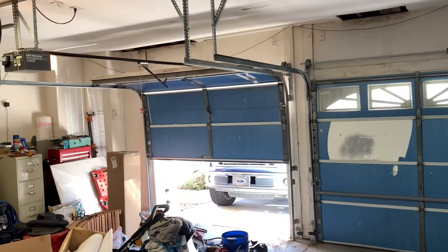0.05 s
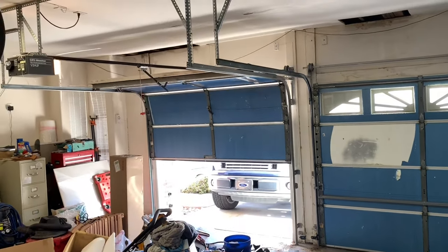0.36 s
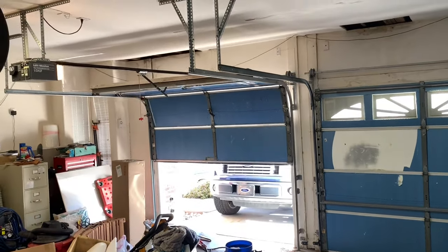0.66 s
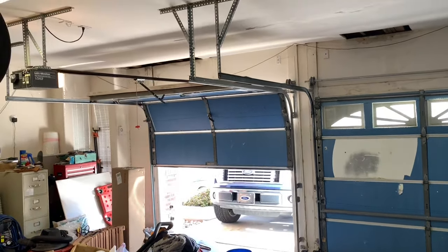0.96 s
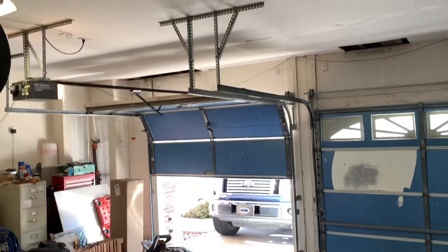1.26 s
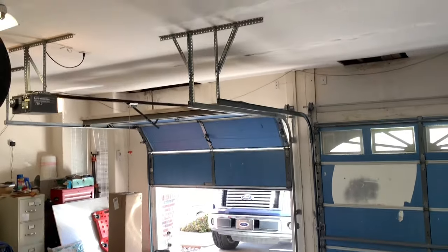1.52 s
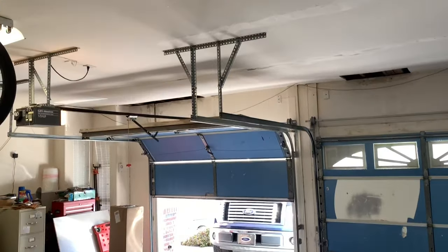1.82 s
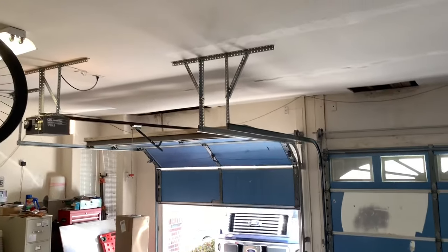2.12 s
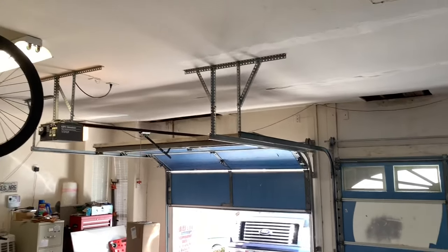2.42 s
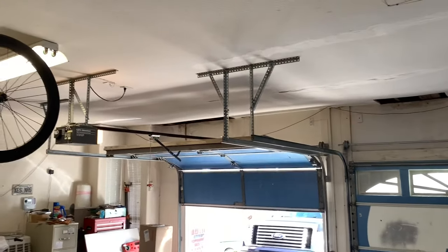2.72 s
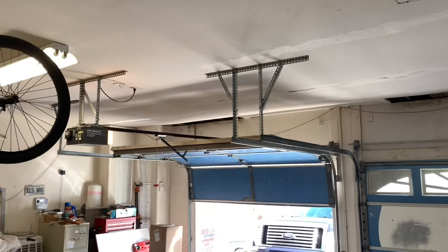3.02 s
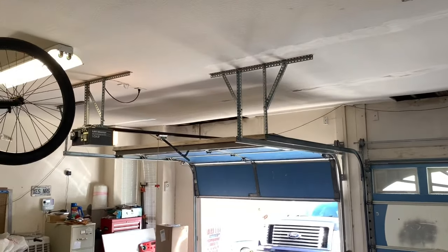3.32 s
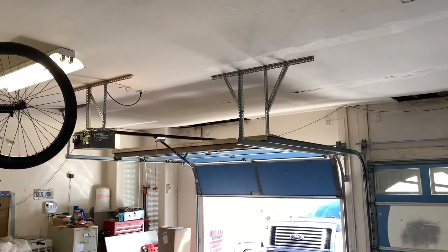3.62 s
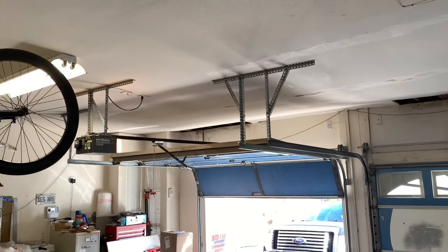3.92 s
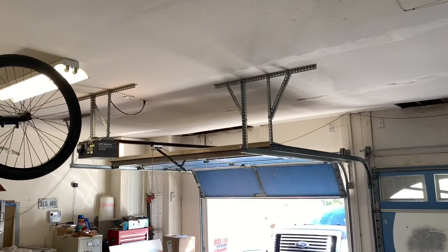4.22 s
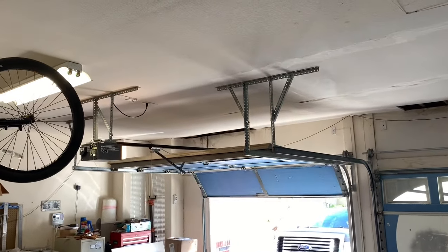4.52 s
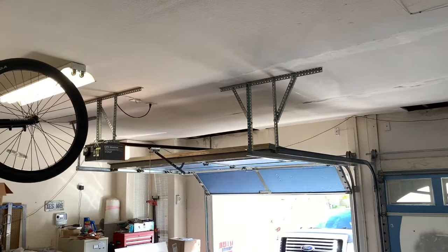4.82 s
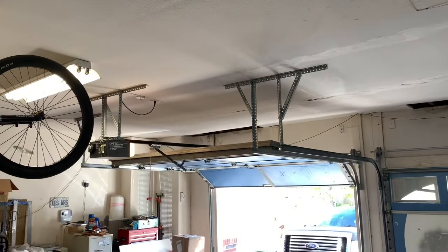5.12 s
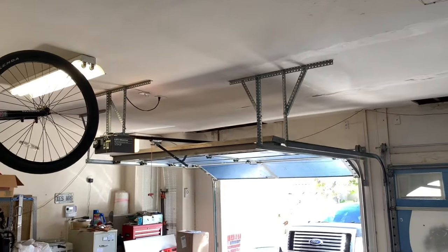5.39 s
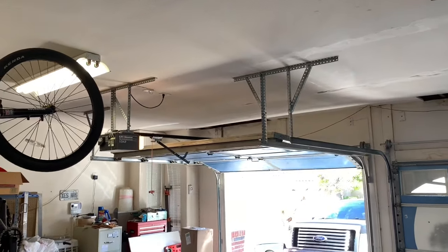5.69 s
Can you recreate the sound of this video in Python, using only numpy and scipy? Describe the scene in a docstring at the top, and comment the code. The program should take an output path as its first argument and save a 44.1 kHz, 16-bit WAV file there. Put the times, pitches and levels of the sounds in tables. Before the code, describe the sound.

A sectional garage door rolls open with a low motor hum, rattling panels, grinding rollers and one clank near the end.

```python
"""A motor hums and steel panels rumble: an electric opener lifts a sectional door a few metres away.
Magnetic forces make the hum, at twice the mains frequency. The chain jingles and jolts the door about
six times a second, while rollers grind along their tracks and shake the panels. Hinges tick as they
fold, and near the end one section drops over with a clank. The hard garage walls reverberate."""
import sys
import numpy as np
from scipy import signal
from scipy.fft import rfft, irfft
from scipy.io import wavfile

SR = 44100
rng = np.random.default_rng(int(sys.argv[2]) if len(sys.argv) > 2 else 0)


def generate_wav(signal):
    """Clip the signal to [-1, 1] and save it as 16-bit WAV at the path in sys.argv[1]."""
    frames = np.transpose(np.atleast_2d(signal))
    scaled = np.clip(frames, -1, 1) * 32767
    pcm = np.round(scaled).astype(np.int16)
    wavfile.write(sys.argv[1], SR, pcm)


N = 253575
TIME = np.arange(N) / SR
MAINS_HZ, WAVER_HZ = 60.007, 352

# The hum eases once most of the door lies overhead.
# Each row: time in seconds, level of the hum in dB, level of its octave in dB.
HUM_LEVELS = [(0, -17, -26), (.45, -17, -25), (.95, -18, -24.5), (1.35, -18.5, -25), (1.7, -17.5, -24.5),
              (2.3, -18.5, -27), (2.47, -18, -21.5), (2.7, -19, -26.5), (3.0, -17.5, -25),
              (3.7, -17, -22.5), (4.35, -22.5, -27.5), (5.0, -25, -26), (5.75, -22.5, -30.5)]
# That octave briefly fades four times. Each row: time in seconds, change in dB.
OCTAVE_DIPS = [(1.59, -8.5), (2.06, -24), (2.54, -17), (3.92, -7.5)]
# Buzz of the motor housing. Each row: multiple of the hum frequency, dB relative to the octave.
HOUSING_BUZZ = [(3, -24), (4, -23), (5, -27), (6, -26), (7, -27)]

# Shudder of the panels, grind of the rollers and jingle of the chain as the door travels.
# Each row: time in seconds, relative level in dB.
PANEL_LEVELS = [(0, -22.8), (.8, -24.3), (1.25, -21.3), (1.6, -21.5), (2.0, -20.3), (2.7, -21.7),
                (3.3, -21.3), (3.6, -19.5), (3.9, -22), (4.13, -20.5), (4.4, -22.8), (4.75, -22.5),
                (5.1, -19.3), (5.45, -23), (5.75, -20.7)]
ROLLER_LEVELS = [(0, -29), (.7, -29.5), (1.8, -26.5), (2.25, -22), (2.6, -27.5), (3.2, -26.5), (3.8, -25),
                 (4.1, -26.5), (4.3, -27), (4.75, -29), (4.97, -24), (5.5, -26.5), (5.75, -27)]
CHAIN_LEVELS = [(0, -.5), (.6, 0.5), (1.5, -2.5), (2.05, -1), (2.75, 2), (3.15, 1.5), (3.9, -1.5),
                (4.2, -4), (4.8, -0.5), (5.3, -3), (5.75, -7.5)]

# Tugs of the chain. Each row: peak time in seconds, clatter of fittings in dB, knock of panels in dB.
TUGS = [(.035, -27.5, -29), (.185, -26, -26.5), (.34, -28.5, -27.5), (.495, -31, -27.5), (.68, -36, -31.5),
        (.77, -34, -37), (.835, -30.5, -31), (.91, -30, -25), (1.01, -32, -32), (1.165, -28, -27),
        (1.35, -27.5, -32), (1.465, -34, -32), (1.63, -26.5, -24.5), (1.8, -31, -33), (1.9, -32.5, -42),
        (1.98, -23, -48), (2.135, -25.5, -32), (2.275, -25, -29), (2.37, -33, -32), (2.48, -26.5, -32),
        (2.64, -26, -29.5), (2.785, -29.5, -33), (2.946, -27.5, -27), (3.095, -26, -31),
        (3.245, -27.5, -30.5), (3.385, -29.5, -26.5), (3.55, -34, -28.5), (3.68, -46, -32),
        (3.79, -56, -25.5), (3.95, -35, -27.5), (4.065, -48, -25), (4.44, -34, -33.5), (4.56, -38, -30.5),
        (4.73, -33, -35), (4.9, -43, -29), (5.44, -32, -40), (5.63, -48, -28), (5.73, -30, -27.5)]
# Hinges snapping. Each row: start in seconds, relative level in dB, offsets of clink and ring in dB.
HINGE_SNAPS = [(.063, -22.5, 4.5, -15), (.12, -18, -12, -25), (0.502, -23.5, 1, -20), (.655, -14, -2, -15),
               (.888, -21, 2, 3), (.982, -19.5, -13, -20), (1.133, -24, -4, -23), (1.273, -21, -2, -13),
               (1.336, -17, -13, -25), (1.45, -22.5, -1, -10), (1.508, -27, -12, -20),
               (1.786, -37, -7, -15), (1.885, -26.5, 3, -4), (2.094, -27, 11, 6), (2.239, -18, -0.5, 2),
               (2.603, -17.5, -1, -13), (2.879, -28, -10, -25), (3.019, -27, -8, -15), (3.089, -25, 2, -1),
               (3.183, -40, -8, -20), (3.603, -29, -8, -20), (3.672, -21.5, -12, -15),
               (3.82, -16.5, -14, -25), (3.892, -17, -10, -20), (3.961, -23.5, 2, -20),
               (4.817, -20.5, -21, -30), (5.34, -24, -3, -16)]
# A section dropping and bouncing. Each row: start in seconds, relative level in dB.
SECTION_BLOWS = [(5.030, -15), (5.042, -17), (5.053, 0), (5.063, -3.5), (5.088, -6.5), (5.116, -10)]

# Tone colours as heard. Each row: frequency in Hz, relative spectral density in dB.
PANEL_SPECTRUM = [(22, -11), (32, -21), (40, -1), (53, 0.5), (70, -1), (100, -1), (135, -6.5), (195, -4),
                  (240, -4.5), (280, -7.5), (350, -10), (410, -12.5), (520, -14.5), (800, -30)]
CLATTER_SPECTRUM = [(800, -8), (1400, -1), (2000, 0.5), (2450, -2.5), (2800, -5), (3300, -4), (4500, -13),
                    (6000, -21), (9000, -17.5)]
KNOCK_SPECTRUM = [(300, -8.5), (520, 5.5), (850, 3.5), (1150, 1.5), (1700, -7), (3500, -23)]
ROLLER_SPECTRUM = [(250, -18), (450, 1.5), (700, 1), (900, 1), (1300, -4), (2200, -8.5), (3500, -16),
                   (7000, -24.5)]
CLANK_SPECTRUM = [(150, -4), (500, -5), (1200, -3.5), (1600, 1), (2100, 5), (2800, 5.5), (3600, 2.3),
                  (4100, 0), (4750, 1.8), (5400, -4.5), (8000, -8), (10300, -8), (13000, -12), (15000, -20)]
TICK_SPECTRUM = [(2000, -7), (4500, -8), (7500, -7), (9200, -3.5), (10600, -9), (14000, -10), (15000, -14)]
CLINK_SPECTRUM = [(1000, -9), (2200, -8), (3300, -3), (4600, -3.5), (5500, -5.5), (7500, -17)]
# Tone colour of the bright jingle as heard. Each row: frequency in Hz, relative spectral density in dB.
JINGLE_SPECTRUM = [(1200, -12), (2500, -3), (3400, -1.5), (4500, -2), (5500, -6.5), (6300, -9.5),
                   (7500, -11), (8700, -10.5), (10300, -10), (11800, -13), (13200, -9.8), (14500, -13)]

# Modes of a section's steel edge, a hinge plate and the door's hardware.
# Each row: frequency in Hz, relative level in dB, time to decay by 60 dB in seconds.
EDGE_MODES = [(2013, -2, .15), (2719, -2, .12), (2961, 2, .13), (3170, -2, .1), (3650, 0, .1),
              (4258, 0, .12), (4690, -1, .12), (4830, 1, .12), (6298, 0, .12), (7130, -2, .1),
              (7558, 0, .12)]
HINGE_MODES = [(4215, 0, .13), (3560, -10, .08), (5210, -10, .08)]
HARDWARE_MODES = [(1650, -2, .15), (2080, 1, .15), (2480, 0, .12), (2720, -1, .1), (2950, -1, .1),
                  (3600, 1, .1), (4154, -2, .25), (4775, 3, .2), (6089, -3, .25), (7555, -6, .2)]

# Decay of sound in the garage. Each row: frequency in Hz, reverberation time in seconds.
GARAGE_T60 = [(60, 0.56), (500, 1), (2500, 0.79), (6000, 0.44), (13000, 0.21)]
# Width of the diffuse field. Each row: frequency in Hz, side level minus mid level in dB.
FIELD_WIDTH = [(60, -11.5), (150, -15.5), (280, -9), (500, -3.5), (1500, -0.5), (4000, -.5), (8000, 0.5),
               (13000, -1)]


def motor():
    """Magnetic force peaks twice per mains cycle; the hum wavers slightly and its octave briefly fades."""
    phase = 2 * np.pi * 2 * MAINS_HZ * TIME
    hum_db, octave_db = curve(HUM_LEVELS), curve(HUM_LEVELS, column=2)
    dip_db = sum(db * swell(s, rise_s=.028, fall_s=.028) for s, db in OCTAVE_DIPS)
    hum = undb(hum_db + .53 * wander(54)) * np.cos(phase + .024 * wander(7.9))
    octave = undb(octave_db + dip_db + .3 * wander(8)) * np.cos(2 * phase + .02 * wander(6))
    buzz = sum(undb(octave_db + db + 2 * wander(6.8)) * np.cos(k * phase + .5 * wander(2))
               for k, db in HOUSING_BUZZ)
    # a faint tone wavers above the hum
    waver_gain = undb(hum_db - 20 + 2 * wander(6.3))
    waver = waver_gain * np.cos(2 * np.pi * WAVER_HZ * TIME + 1.33 * wander(5.8))
    return np.sqrt(2) * (hum + octave + buzz + waver)


def panels():
    """Forced vibration: the wide sections shudder as they roll and radiate a low boom."""
    boom = diffuse(contacts(2500, 2.56), contacts(2500, 3), PANEL_SPECTRUM)
    return boom * undb(curve(PANEL_LEVELS))


def jolts():
    """Impact excitation: each tug shifts the sections, so fittings clatter and panels knock dully."""
    shake = sum(tug(s) * undb(db) for s, db, _ in TUGS)
    bump = sum(tug(s) * undb(db) for s, _, db in TUGS)
    fittings = np.array([contacts(3500, 2.5) for _ in range(2)])
    mid, side = fittings + undb(-6) * pings(480, low_hz=1100, high_hz=2700)
    clatter = diffuse(mid, side, CLATTER_SPECTRUM) * linger(shake, wet_db=-2.5)
    knock = diffuse(contacts(2500, 2), contacts(2500, 2), KNOCK_SPECTRUM) * linger(bump, wet_db=-2)
    return clatter + knock


def rollers():
    """Rolling noise: steel wheels strike grit and dents, and the track rings briefly here and there."""
    grit = np.array([contacts(3000, 1.34) for _ in range(2)])
    mid, side = grit + undb(-12.5) * pings(420, low_hz=900, high_hz=2900)
    return diffuse(mid, side, ROLLER_SPECTRUM) * undb(curve(ROLLER_LEVELS))


def section_clank():
    """Impact and rebound: a section drops over the bend of the track, exciting the modes of its edge."""
    crack = blows(SECTION_BLOWS, chatter_s=.0075)
    ring = undb(5) * struck(SECTION_BLOWS, EDGE_MODES)
    return undb(-7.5) * garage(colour(crack + ring, CLANK_SPECTRUM), direct_db=-3, places=2)


def hinges():
    """Transient excitation: a folding hinge ticks and clinks, and its plate rings on freely."""
    ticks = [(s, db) for s, db, _, _ in HINGE_SNAPS]
    clinks = [(s, db + clink_db) for s, db, clink_db, _ in HINGE_SNAPS]
    rings = [(s, db + ring_db) for s, db, _, ring_db in HINGE_SNAPS]
    tick = undb(4) * colour(blows(ticks, chatter_s=.0061), TICK_SPECTRUM)
    clink = undb(5) * colour(blows(clinks, chatter_s=.014), CLINK_SPECTRUM)
    ring = undb(15) * struck(rings, HINGE_MODES)
    return garage(tick + clink + ring, direct_db=-6, places=8)


def chain():
    """Loose links collide at random and excite faint resonances in the steel hardware."""
    dip_db = sum(tug(s) for s, _, _ in TUGS)  # about 1 dB softer at each tug
    level_db = curve(CHAIN_LEVELS) - dip_db + 2.8 * wander(35)
    links = contacts(420, 4.5) * undb(level_db)
    jingle = colour(links + undb(-20) * resonate(links, HARDWARE_MODES), JINGLE_SPECTRUM)
    return undb(-36) * unit(garage(jingle, direct_db=-16, places=20))


def tug(peak_s):
    """A pulse of tension: the chain tightens quickly and slackens more slowly."""
    return swell(peak_s, rise_s=.02, fall_s=.034)


def contacts(per_second, scatter_db):
    """Shot noise: tiny independent impacts, a few harder than the rest; rms 1."""
    impulses = (rng.random(N) < per_second / SR) * rng.choice([-1, 1], N)
    return unit(impulses * undb(scatter_db * np.minimum(rng.standard_normal(N), 2)))


def blows(events, chatter_s):
    """Contact chatter: each blow of metal on metal is a noise burst with exponential decay."""
    force = sum(undb(db) * (TIME >= s) * np.exp(-np.abs(TIME - s) / chatter_s) for s, db in events)
    return force * rng.standard_normal(N)


def pings(per_second, low_hz, high_hz):
    """Damped oscillation of small steel parts, each at its own pitch and place; mid and side, rms 1."""
    t = TIME[:SR // 12]
    fade = decay(t, t60=.12)
    mid_side = np.zeros((2, N + 2 * len(t)))
    for when, pitch, size, place in rng.random((int(per_second * N / SR), 4)):
        start, angle = int(when * (N + len(t))), 2 * np.pi * place
        ring = size * fade * np.sin(2 * np.pi * (low_hz + pitch * (high_hz - low_hz)) * t)
        mid_side[:, start:start + len(t)] += np.outer([np.cos(angle), np.sin(angle)], ring)
    return unit(mid_side[:, len(t):len(t) + N])


def struck(events, modes):
    """An impulse excites all the modes of a part at once."""
    force = np.zeros(N)
    for s, db in events:
        force[int(s * SR)] += undb(db)
    return resonate(force, modes)


def resonate(force, modes):
    """Modal superposition: the force is convolved with a sum of damped sines of total energy 1."""
    t = TIME[:SR // 2]
    ring = sum(undb(db) * np.sin(2 * np.pi * hz * t) * decay(t, t60) for hz, db, t60 in modes)
    return signal.oaconvolve(force, ring / np.linalg.norm(ring))[:N]


def garage(x, direct_db, places):
    """Room response depends on position: a moving part meets new reflections at each place."""
    place = (places - 1) * TIME / TIME[-1]
    ears = np.zeros((2, 2 * N))
    for k in range(places):
        near = np.flatnonzero(np.abs(place - k) < 1)
        crossfaded = x[near] * np.cos(np.pi / 2 * (place[near] - k))
        wet = signal.fftconvolve(room_response(direct_db), crossfaded[None], axes=1)
        ears[:, near[0]:near[0] + wet.shape[1]] += wet
    return ears[:, :N]


def room_response(direct_db):
    """Impulse response at two ears: direct sound plus dense reflections that die sooner in the treble."""
    size = 2 ** 14
    t, hz = TIME[:size], np.fft.rfftfreq(size, 1 / SR)
    noise = rfft(rng.standard_normal((2, size)))
    tail = 0
    for band_hz, t60 in GARAGE_T60:
        band = at_hz([(f, f == band_hz) for f, _ in GARAGE_T60], hz)
        tail = tail + irfft(noise * band) * decay(t, t60)
    mid, side = unit(tail) / np.sqrt(size)
    side = irfft(rfft(side) * undb(at_hz(FIELD_WIDTH, hz)))
    ears = np.array([mid + side, mid - side])
    ears[[0, 1], [2, 0]] += undb(direct_db)  # direct sound reaches the right ear two samples sooner
    return ears * np.sqrt(2) / np.linalg.norm(ears)


def diffuse(mid, side, spectrum):
    """In a diffuse field the two ears receive similar bass but unrelated treble; rms 1."""
    side = colour(colour(side, spectrum), FIELD_WIDTH)
    return unit(colour(mid, spectrum) + np.array([side, -side]))


def linger(envelope, wet_db, t60=.4):
    """Reverberant decay: the room stores a share of a rattle's energy and loses it exponentially."""
    retained = np.exp(-2 * np.log(1000) / (t60 * SR))
    stored = signal.lfilter([1 - retained], [1, -retained], envelope ** 2)
    return np.sqrt(envelope ** 2 + undb(wet_db) ** 2 * stored)


def colour(x, spectrum):
    """A minimum-phase filter imposes the spectrum, falling 12 dB per octave beyond its ends."""
    size = 2 ** 14
    hz = np.maximum(np.fft.rfftfreq(size, 1 / SR), 1)
    skirts = np.minimum(1, hz / spectrum[0][0]) * np.minimum(1, spectrum[-1][0] / hz)
    cepstrum = irfft(np.log(undb(at_hz(spectrum, hz)) * skirts ** 2))
    cepstrum[1:size // 2] *= 2  # folding the cepstrum makes the filter causal
    cepstrum[size // 2 + 1:] = 0
    return signal.oaconvolve(x, irfft(np.exp(rfft(cepstrum))))[:N]


def wander(rate_hz):
    """Low-passed noise gives smooth random modulation; rms 1."""
    hz = np.fft.rfftfreq(N, 1 / SR)
    return unit(irfft(rfft(rng.standard_normal(N)) * np.exp(-(hz / rate_hz) ** 2), N))


def swell(peak_s, rise_s, fall_s):
    """A Gaussian pulse of height 1, with its own width on each side."""
    lag = TIME - peak_s
    return np.exp(-.5 * np.minimum(np.abs(lag) / np.where(lag < 0, rise_s, fall_s), 10) ** 2)


def decay(t, t60):
    """Exponential damping, by 60 dB in t60 seconds."""
    return np.exp(-np.log(1000) * t / t60)


def curve(table, column=1):
    """Interpolate one column of a time table at every sample."""
    rows = np.array(table)
    return np.interp(TIME, rows[:, 0], rows[:, column])


def at_hz(points, hz):
    """Interpolate (Hz, value) points on a log-frequency axis."""
    f, value = np.transpose(points)
    return np.interp(np.log(np.maximum(hz, 1)), np.log(f), value)


def pan(x, left_db):
    """Level difference gives direction: the left channel exceeds the right by left_db."""
    return x * undb(np.array([[left_db], [-left_db]]) / 2)


def undb(db):
    """Decibels to amplitude ratio."""
    return 10 ** (np.asarray(db) / 20)


def unit(x):
    """Scale to rms 1."""
    return x / np.sqrt(np.mean(x ** 2))


def scene():
    """Superposition: hum and rumble stand a little to the right, and rattles come from all around."""
    bass = pan(motor(), left_db=-3) + pan(panels(), left_db=-.5)
    rattles = pan(rollers(), left_db=-1) + pan(jolts(), left_db=-.5) + chain()
    return bass + rattles + pan(hinges(), left_db=.5) + section_clank()


def record(dry):
    """Band limiting: a steep low-pass filter removes the highest treble."""
    cutoff_hz = 14600
    return signal.sosfilt(signal.ellip(8, .2, 70, cutoff_hz, fs=SR, output="sos"), dry)


dry = scene()
out = record(dry)
generate_wav(out)
```